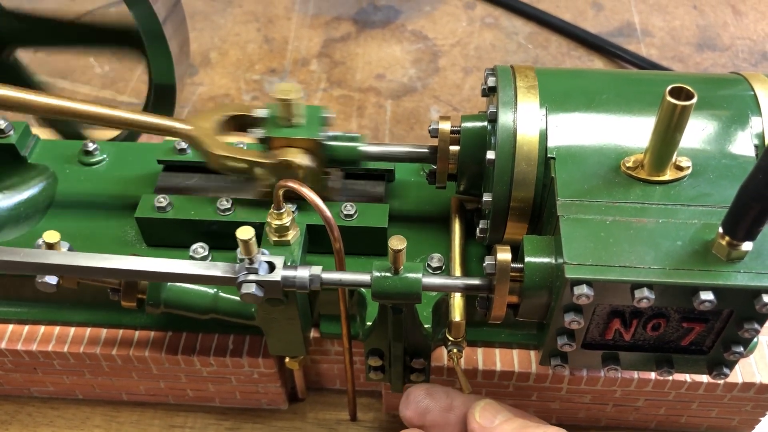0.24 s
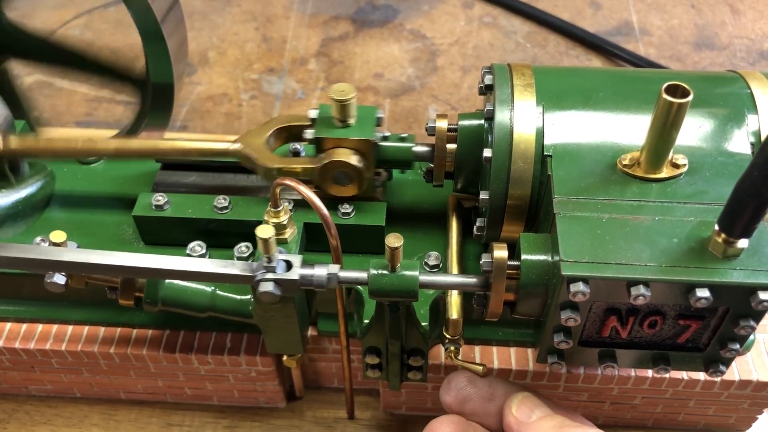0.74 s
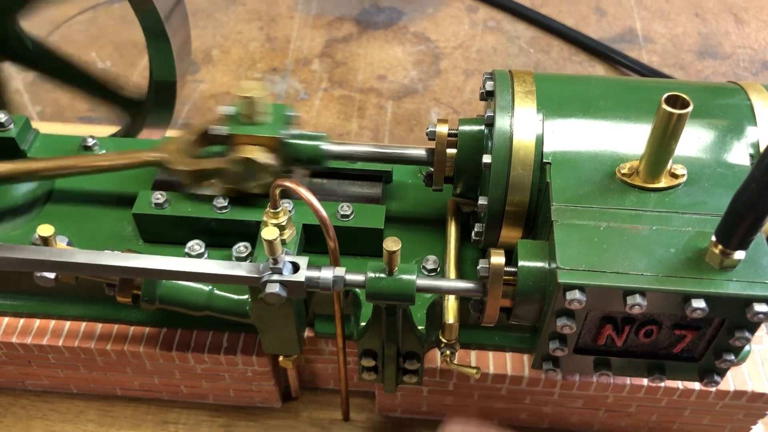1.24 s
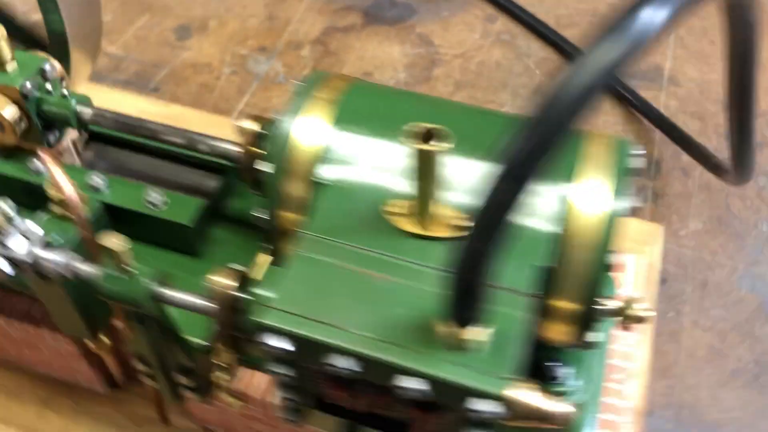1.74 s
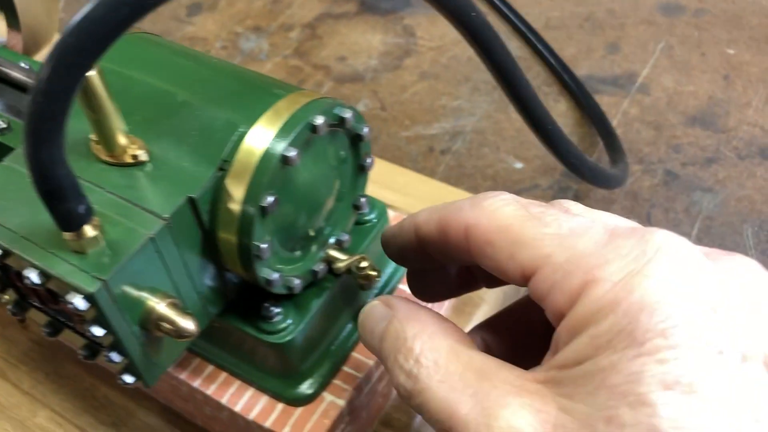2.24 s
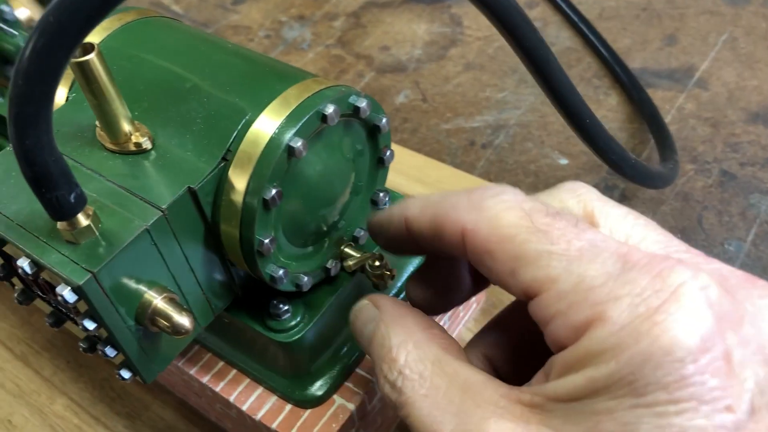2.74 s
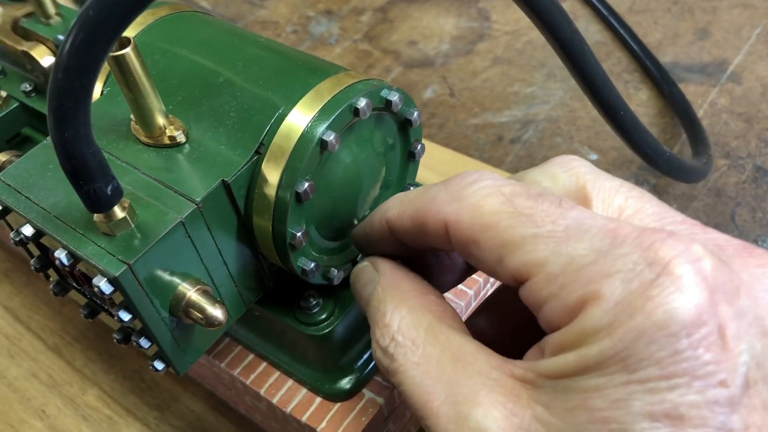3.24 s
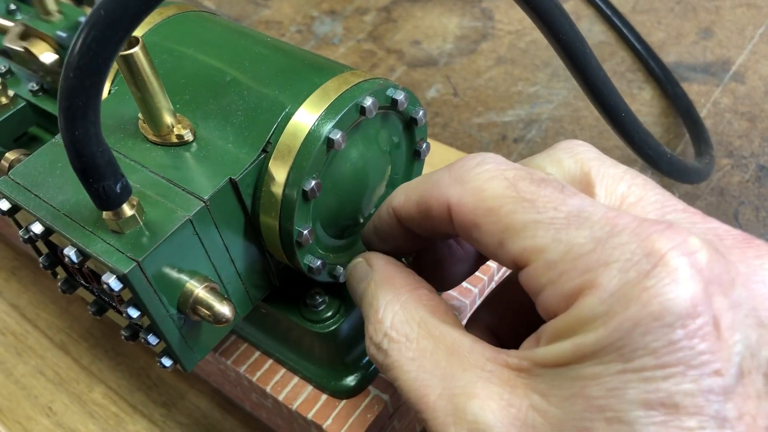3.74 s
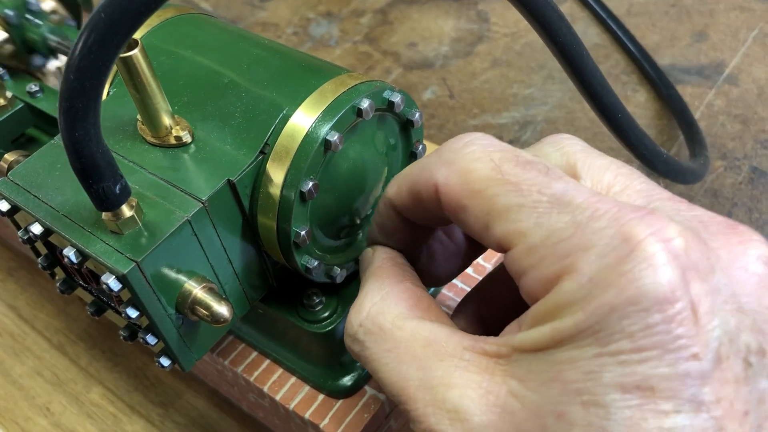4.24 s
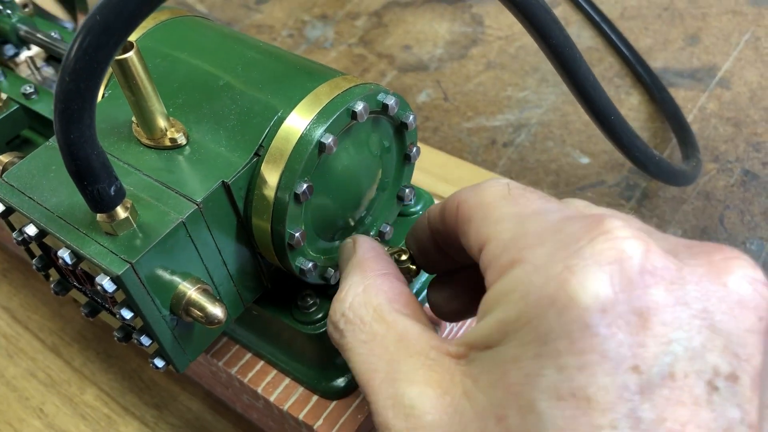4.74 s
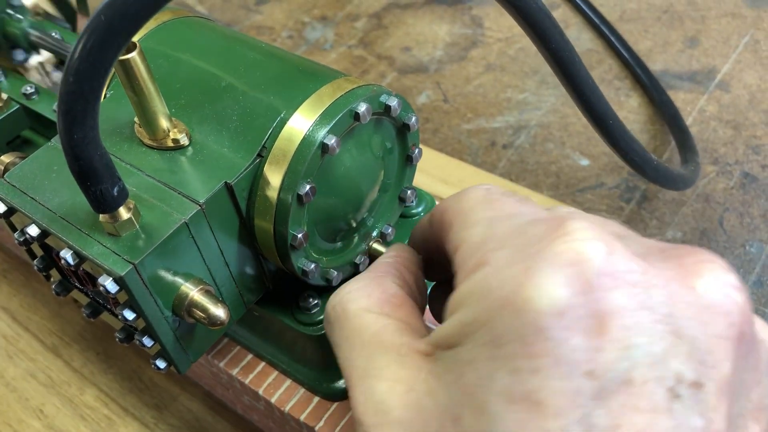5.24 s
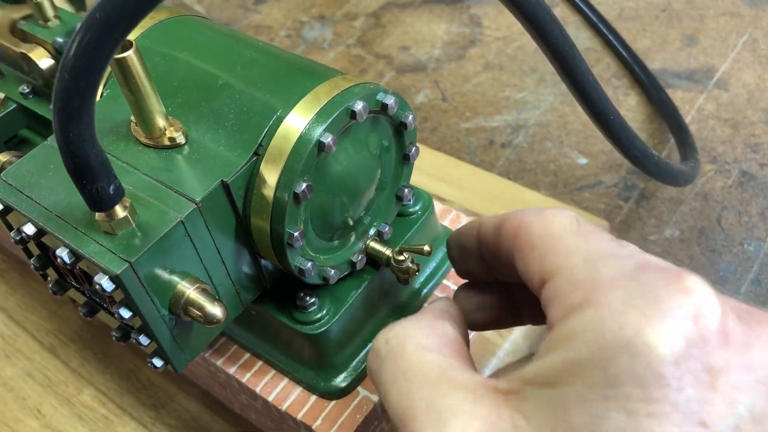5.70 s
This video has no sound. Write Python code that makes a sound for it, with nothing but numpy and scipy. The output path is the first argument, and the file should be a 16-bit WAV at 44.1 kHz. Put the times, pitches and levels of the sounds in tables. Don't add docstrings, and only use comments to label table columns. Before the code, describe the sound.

On a wooden bench indoors, a small model engine runs on compressed air. A bright jet from a drain cock shuts almost at once; then regular hissing strokes, about three per second, alternate with valve ticks, tiny puffs and dull bench thumps. The close microphone moves from the side to the cylinder end around two seconds, changing the hiss colour. Near the close, two strong air blasts burst out.

```python
import sys
import numpy as np
from scipy import signal
from scipy.fft import rfft, irfft, next_fast_len
from scipy.io import wavfile

SR = 44100
rng = np.random.default_rng(int(sys.argv[2]) if len(sys.argv) > 2 else 0)


def inscribe(sig):
    pcm = np.round(np.clip(np.atleast_2d(sig).T, -1, 1) * 32767)
    wavfile.write(sys.argv[1], SR, pcm.astype(np.int16))


def makeup_ratio(level_db):
    decades = np.asarray(level_db, float) / 20
    return 10 ** decades


N = 263277
TIME = np.arange(N) / SR

# time_s, place (0 side, 1 corner, 2 cylinder end)
MIC_WALK = [
    (1.55, 0.45),
    (1.8, 1.05),
    (2.15, 0.96),
    (2.35, 2.2),
]

# pitch_hz, level_db (per Hz)
FLOOR = [(30, -56), (55, 5.5), (90, 0), (150, -4), (200, -7.5), (280, -1.5), (450, -13), (1000, -23.5),
         (2200, -28.5), (4000, -22), (8000, -29), (12000, -29), (16000, -41)]
FLOOR_DB = -53
ROOM_DB, ROOM_T60_S = -19.5, 0.19

# start_s, puff_db, bearing_blow_db
REVERSALS = [(-0.153, -29, -10), (0.133, -29, -3), (0.4697, -29.5, -5.5), (0.7797, -28, 3),
             (1.0912, -27, -8), (1.3915, -28.5, 4), (1.6998, -26.5, -5), (1.9984, -27.5, 6),
             (2.3085, -26.5, -9), (2.6069, -29, 0), (2.9154, -28.5, -8.5), (3.2145, -27, 2),
             (3.5228, -28, -8.5), (3.82, -29.5, 4), (4.128, -28, -7), (4.4261, -28, -4),
             (4.7359, -26.5, -6), (5.0317, -28.5, 8), (5.363, -29, -11), (5.6767, -28.5, 9),
             (6.015, -29, -11)]
REVERSAL_S, PUFF_DB, BLOW_DB = np.transpose(REVERSALS)
END = np.arange(len(REVERSALS)) % 2
# (outer end s, inner end s)
PORT_SHUTS_S, PUFF_S = (.008, .005), (.029, .021)
PORT_OPENS_S, SLACK_S = (.073, .062), (.0835, .0193)

# start_s, level_db
CROSSHEAD = [(0.3673, 0), (0.9943, 5), (1.6039, 7.5), (2.214, 4), (2.821, 1), (3.4283, 1), (4.0335, 2.5),
             (4.639, 0), (5.2468, 1), (5.9009, 1)]
# delay_s, pitch_hz, level_db, rise_s, t60_s
OUTER_BLOWS = [(-.062, 253, -53, .003, 0.056), (-.027, 99.6, -35, 0.0014, 0.068),
               (-.009, 104, -40, 0.0044, 0.067), (-.002, 322, -33, 0.0017, 0.048),
               (0.026, 74, -27, 0.0084, 0.12), (0.129, 298, -35, .003, .06),
               (.128, 129.4, -37, 0.0041, 0.095), (.127, 625, -44, .002, 0.026),
               (0.158, 294, -39, 0.001, 0.05)]
# delay_s, pitch_hz, level_db, rise_s, t60_s
INNER_BLOWS = [(-.016, 273, -38.5, 0.0017, 0.043), (.006, 90, -65, .004, .05),
               (.029, 107, -41, 0.0044, 0.12), (0.046, 106, -46.5, .004, 0.082),
               (.076, 68.5, -38.5, 0.0028, 0.088)]
# delay_s, pitch_hz, level_db, rise_s, t60_s
CROSSHEAD_BLOWS = [(0.0, 261, -32.5, .003, .05), (.003, 150, -41, .004, .06), (-.005, 690, -37, .0015, .03),
                   (-.003, 450, -39, .002, .03), (-.006, 950, -43, .001, .025), (.03, 113, -43, .004, .06)]

# time_s, pressure_db, lowest_pitch_hz (a wider hole sounds lower)
JETS = [
    [(0.0, -37.5, 4600), (0.06, -38.5, 4700), (0.098, -39.5, 3760), (0.134, -45, 4100), (0.17, -74, 4200)],
    [(0.19, -75, 11000), (0.22, -69, 11000), (0.4, -63, 11000), (0.46, -73, 11000)],
    [(5.099, -82, 10000), (5.115, -48, 10000), (5.131, -36.5, 6750), (5.25, -36.5, 7150),
     (5.319, -33, 4890), (5.357, -40, 3550), (5.385, -48, 4770), (5.41, -79, 5000)],
    [(5.43, -75, 11000), (5.46, -66, 11090), (5.62, -61, 10900), (5.67, -75, 11100)],
    [(5.722, -55, 6920), (5.738, -31, 6440), (5.756, -29, 6800), (5.862, -34.5, 7700), (5.91, -35, 8500),
     (5.97, -31.5, 8300)],
]
# pitch_hz, width_hz, level_db
COCK_BORE = [(2000, 250, -1), (5000, 500, 1)]
# pitch_hz, level_db (per band)
JET_COLOUR = [(2000, -5), (4000, -8), (7000, -7.1), (10000, 2), (13000, 3), (16000, 1)]
COCK_BORE_DB = 1
JET_FALL_DB_PER_OCTAVE = 14

TICK_DB = [(-45, -42.5, -42), (-43, -42.5, -42.5)]
TICK_HZ = [(2050, 1800, 1545), (2000, 2120, 2125)]
TICK_DROP, TICK_DROP_S = .9, .004

# pitch_hz, width_hz, level_db
PUFF_HIGH = [(6413, 150, 1.5), (6820, 250, 1.5), (8200, 760, -6), (8880, 250, 3.5), (10040, 690, -1.5),
             (10220, 99, 6), (12900, 57, -10), (15600, 1400, -19)]
# pitch_hz, width_hz, level_db
PUFF_MID = [(2950, 630, -10.0), (3616, 224, 1.5), (3870, 213, 0.5)]
# pitch_hz, width_hz, level_db
PUFF_LOW = [(793, 530, -2.5), (1017, 290, 1)]
PUFF_LENGTH_S, PUFF_MID_DB, PUFF_LOW_DB = 0.016, (-16, -12), (-15.5, -14.5)
PUFF_RISE = 0.82

# stroke_share, flow_db
ROD_END = [(0, -22), (.035, 3.5), (.12, 2.5), (.4, 7.5), (.65, 7.5), (.8, 1.5), (.93, -4.5), (1, -24)]
# stroke_share, flow_db
COVER_END = [(0, -7), (0.033, 5), (.12, 8.5), (.35, 10), (0.552, 7), (.8, 2), (0.929, -2.5), (0.999, -21)]
# pitch_hz, width_hz, level_db
PIPE_SIDE = [(2985, 24, -18.5), (3630, 91, -5), (3950, 270, 2.5), (4227, 83, 2), (6330, 76, 4),
             (6950, 310, 7), (7840, 240, 4), (8970, 72, 8), (9130, 780, 10.5), (9620, 200, -10),
             (10500, 390, -0.5), (11380, 190, -6), (12200, 150, -1),
             (4920, 98, -3), (5780, 340, -12)]
# pitch_hz, width_hz, level_db
PIPE_CORNER = [(3306, 180, 2), (4254, 68, -4), (5140, 33, -7.5), (5890, 82, -7.5), (7260, 460, 7.5),
               (7440, 59, 10), (8080, 33, 11.5), (9280, 230, 9), (10000, 410, 4), (11500, 41, -28),
               (12400, 39, 4)]
# pitch_hz, width_hz, level_db
PIPE_END = [(3680, 250, -11), (3273, 104, -1), (3482, 35, -4.5), (4120, 240, -4.5), (5320, 72, -9.5),
            (5760, 170, -12.5), (7110, 99, 3.5), (8330, 220, 3.5), (9870, 280, 5), (10300, 94, 3),
            (10720, 27, 5), (11200, 52, -3.5), (12140, 300, -6), (11830, 28, -23)]
# pitch_hz, width_hz, level_db
PIPE_BASS = [(1228, 62, 0), (1400, 150, -12)]
# pitch_hz, width_hz, level_db
PIPE_TOP = [(13400, 400, -20), (15100, 1200, 6)]
# pitch_hz, level_db (per Hz)
HISS = [(250, -18.5), (400, -11.5), (700, -11), (1000, -6.5), (1500, -11.5), (1900, -14), (2600, -4.5),
        (3300, -12.5), (4800, -11), (7000, -1), (10000, 0), (12000, -5), (13800, -23), (15300, -19.5)]
# side_db, corner_db, end_db
EXHAUST_DB = [(-40.5, -35.5, -36.5), (-42.5, -38, -38.5)]
TILT_DB, PIPE_BASS_DB = (2.6, -5, -5), (-19, -17, -16)
TOP_DB = [(-19, -14.5, -18), (-17, -18.5, -19.5)]
VENT_LOSS_DB = 5


def rms_one(x):
    return x / np.sqrt(np.mean(x ** 2) + 1e-20)


def coloured(points):
    size = next_fast_len(N)
    hz, db = np.transpose(points)
    bins_hz = np.arange(size // 2 + 1) * SR / size
    shape = makeup_ratio(np.interp(np.log(bins_hz + 1), np.log(hz), db))
    return rms_one(irfft(rfft(rng.standard_normal(size)) * shape, size)[:N])


def drift(rate):
    r = np.exp(-2 * np.pi * rate * 20 / SR)
    slow = signal.lfilter([1], [1, -2 * r, r * r], rng.standard_normal(N // 20 + 2002))[2000:]
    return np.interp(np.arange(N) / 20, np.arange(len(slow)), rms_one(slow))


def resonate(x, peaks, widen=1.24):
    out, power = 0, 0
    for k, (hz, width, db) in enumerate(peaks):
        r = np.exp(-np.pi * width * widen / SR)
        gain = (1 - r * r) / 2
        poles = [1, -2 * r * np.cos(2 * np.pi * hz / SR), r * r]
        mode = signal.lfilter(gain * np.array([1, 0, -1]), poles, x + 1e-18)
        out = out + (-1) ** k * makeup_ratio(db) * mode
        power += makeup_ratio(2 * db) * gain
    return out / np.sqrt(power)


def band(x, low_hz, high_hz):
    return signal.sosfilt(signal.butter(3, [low_hz, high_hz], "band", fs=SR, output="sos"), x)


def struck(hz, rise, t60, length):
    t = np.arange(round(length * SR)) / SR
    return np.sin(2 * np.pi * hz * t) * (1 - np.exp(-t / rise)) * makeup_ratio(-60 * t / t60)


def add(out, s, wave):
    start = round(s * SR)
    part = wave[max(0, -start):max(0, N - start)]
    out[max(0, start):max(0, start) + len(part)] += part


def seen(values, s):
    return np.interp(np.interp(s, *np.transpose(MIC_WALK)), [0, 1, 2], values)


def sealed():
    def cock_open(s):
        return any(jet[0][0] <= s <= jet[-1][0] for jet in JETS)
    return [k for k, s in enumerate(REVERSAL_S) if 0 < s < TIME[-1] and not cock_open(s)]


def centres(end):
    return list(zip(REVERSAL_S[end::2] + SLACK_S[end], BLOW_DB[end::2]))


def room_tone():
    return makeup_ratio(FLOOR_DB + 1.32 * drift(4.2)) * coloured(FLOOR)


def workshop(x):
    t = np.arange(round(.3 * SR)) / SR
    tail = rng.standard_normal(len(t)) * makeup_ratio(-60 * t / ROOM_T60_S) * (t > .004)
    tail = tail / np.sqrt(np.sum(tail ** 2))
    return signal.fftconvolve(x, band(tail, 760, 14000))[:N]


def crosshead_rattle():
    out, t = np.zeros(N), np.arange(4000) / SR
    for marks, delay in [(CROSSHEAD, -.004), (centres(0), .127)]:
        grits = rng.standard_normal((len(marks), 4000))
        for (s, blow_db), grit in zip(marks, grits):
            rattle = band(grit * makeup_ratio(-60 * t / .1), 170, 850)
            add(out, s + delay, rattle * makeup_ratio(blow_db * .5 - 33))
    return out


def bearings():
    out = np.zeros(N)
    sources = [(centres(0), OUTER_BLOWS), (centres(1), INNER_BLOWS), (CROSSHEAD, CROSSHEAD_BLOWS)]
    for marks, blows in sources:
        scatter = rng.standard_normal((len(marks), len(blows)))
        for (s, blow_db), row in zip(marks, scatter):
            for (delay, hz, db, rise, t60), chance in zip(blows, row):
                level = makeup_ratio(db + .5 * blow_db + chance)
                add(out, s + delay, struck(hz, rise, t60, .2) * level)
    return out


def drain_cock():
    pressure, lowest = np.zeros(N), np.full(N, 1e4)
    for rows in JETS:
        s, db, hz = np.transpose(rows)
        now = (TIME >= s[0]) & (TIME <= s[-1])
        pressure[now] = makeup_ratio(np.interp(TIME[now], s, db))
        lowest[now] = np.interp(TIME[now], s, hz)
    drops = rng.random(N) < 400 / SR
    drop_size = makeup_ratio(3 * np.minimum(rng.exponential(1, N), 2) + 3)
    spit = drops * drop_size * rng.choice([-1, 1], N)
    jet = (rng.standard_normal(N) + spit) * makeup_ratio(0.36 * drift(60) + 1.1 * drift(13))

    def reach(hz):
        return makeup_ratio(-JET_FALL_DB_PER_OCTAVE * np.maximum(np.log2(lowest / hz), 0))

    bore = reach(3900) ** 2 * resonate(jet, COCK_BORE)
    out = makeup_ratio(COCK_BORE_DB) * seen((1, 0, 0), TIME) * bore
    colour_hz, colour_db = np.transpose(JET_COLOUR)
    edges = np.geomspace(1600, 18000, 10)
    for low_hz, high_hz in zip(edges, edges[1:]):
        hz = np.sqrt(low_hz * high_hz)
        level = makeup_ratio(np.interp(np.log(hz), np.log(colour_hz), colour_db))
        out += level * reach(hz) * rms_one(band(jet, low_hz, high_hz))
    return pressure * out


def valve():
    out, t = np.zeros(N), np.arange(1800) / SR
    grit = rng.standard_normal((len(sealed()), 2, 1800))
    for k, (crack, rattle) in zip(sealed(), grit):
        s = REVERSAL_S[k]
        db, hz = seen(TICK_DB[END[k]], s), seen(TICK_HZ[END[k]], s)
        wave = struck(hz, .0004, .018, 1800 / SR) * makeup_ratio(3.0)
        wave[90:] += struck(.64 * hz, .001, .025, 1710 / SR) * makeup_ratio(-5.0)
        bent_t = t - TICK_DROP * TICK_DROP_S * np.exp(-t / TICK_DROP_S)
        wave += np.sin(2 * np.pi * hz * .7 * bent_t) * makeup_ratio(-4 - 60 * t / .03)
        wave += band(crack * makeup_ratio(-60 * t / .015), 900, 4000) * makeup_ratio(9.0)
        swell = (1 - np.exp(-t / 0.00085)) * makeup_ratio(-60 * t / 0.069)
        wave += band(rattle * swell, 335, 1560) * makeup_ratio([9.0, 4.0][END[k]])
        add(out, s, wave * makeup_ratio(db))
    return out


def puffs():
    gates = np.zeros((4, N))
    for k in sealed():
        end = END[k]
        s = REVERSAL_S[k] + PUFF_S[end]
        start = round((s - .01) * SR)
        now = slice(start, start + 2600)
        t = (TIME[now] - s + 0.0053) / PUFF_LENGTH_S
        parts_db = [0, PUFF_MID_DB[end], PUFF_LOW_DB[end], PUFF_LOW_DB[end]]
        shapes = zip(gates, [0.5, 0.56, 0.33, .8], [0.49, 0.59, 0.38, 0.41], parts_db)
        for gate, centre, spread, part_db in shapes:
            away = np.abs((t - centre) / spread / np.where(t < centre, PUFF_RISE, 1))
            gate[now] += np.exp(-away ** 2.5) * makeup_ratio(PUFF_DB[k] + part_db)
    noise = rng.standard_normal((4, N)) * gates
    high = resonate(noise[0], PUFF_HIGH, widen=1.3) + makeup_ratio(-15.0) * band(noise[0], 4500, 16000)
    mid = resonate(noise[1], PUFF_MID, widen=1.58)
    low = makeup_ratio(6.5) * resonate(noise[2], PUFF_LOW) + makeup_ratio(-5.0) * resonate(noise[3], PIPE_BASS, widen=2.0)
    return makeup_ratio(-4.0) * high + makeup_ratio(3.5) * mid + low


def exhaust():
    flow = np.full(N, -60.)
    opening = REVERSAL_S[:-1] + np.take(PORT_OPENS_S, END[:-1])
    shutting = REVERSAL_S[1:] + np.take(PORT_SHUTS_S, END[1:])
    for k, (opens, shuts) in enumerate(zip(opening, shutting)):
        now = (TIME >= opens - .008) & (TIME < shuts + .01)
        share, shape = np.transpose([ROD_END, COVER_END][k % 2])
        flow[now] = np.interp((TIME[now] - opens + .008) / (shuts - opens + .018), share, shape)
    inner = END[np.clip(np.searchsorted(opening - .01, TIME) - 1, 0, None)]

    def by_end(ends):
        return np.where(inner, seen(ends[1], TIME), seen(ends[0], TIME))

    level = by_end(EXHAUST_DB) - VENT_LOSS_DB * (TIME < JETS[0][-1][0])
    top, tilt = by_end(TOP_DB), seen(TILT_DB, TIME)
    place = np.interp(TIME, *np.transpose(MIC_WALK))
    jet = rng.standard_normal((2, N))
    full = makeup_ratio(level + flow + 0.83 * drift(24))
    lagging = makeup_ratio(level + np.where(flow > -59, 0.56 * flow, flow) + 1.2 * drift(23))

    pipe = 0
    for k, peaks in enumerate([PIPE_SIDE, PIPE_CORNER, PIPE_END]):
        nearness = np.sqrt(np.clip(1 - abs(place - k), 0, 1))
        pipe = pipe + nearness * resonate(jet[0] * full, peaks)
    hiss = coloured(HISS)
    air = makeup_ratio(-1.5) * pipe + makeup_ratio(-7.0) * hiss * full

    low = makeup_ratio(seen(PIPE_BASS_DB, TIME)) * resonate(jet[1] * lagging, PIPE_BASS)
    low += makeup_ratio(-4.0) * band(hiss * lagging, 243, 2110)
    low += makeup_ratio(-11.0) * np.clip(1 - place, 0, 1) * band(jet[1] * lagging, 980, 3600)
    middle = band(band(air, 2894, 7900), 2800, 5690)
    bright = band(air, 4730, 12150) * makeup_ratio(tilt - 6.5)
    air_top = air + makeup_ratio(-17.5) * resonate(jet[1] * full, PIPE_TOP)
    edge = band(air_top, 12100, 20800) * makeup_ratio(top + 6.5 + 0.08 * np.maximum(flow, -20))
    return low + middle + bright + edge


def scene():
    air = exhaust() + puffs() + valve() + drain_cock()
    bench = bearings() + crosshead_rattle()
    mono = air + makeup_ratio(ROOM_DB) * workshop(air) + bench + room_tone()
    return np.array([mono, mono])


def low_pass(x):
    return signal.sosfilt(signal.butter(12, 16930, fs=SR, output="sos"), x)


def record(dry):
    rounded = .2 * np.tanh(dry / .2)
    top_cut = signal.ellip(10, .5, 70, 15800, fs=SR, output="sos")
    rumble_cut = signal.butter(2, 40, "high", fs=SR, output="sos")
    mix = signal.sosfilt(rumble_cut, signal.sosfilt(top_cut, rounded))
    return low_pass(mix)


dry = scene()
out = record(dry)
inscribe(out)
```